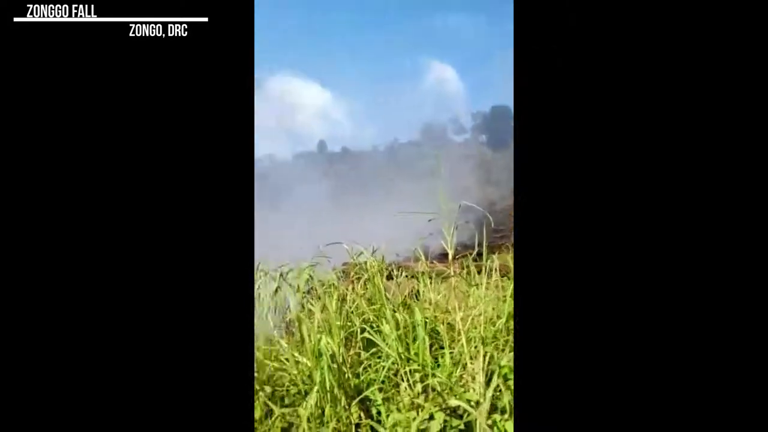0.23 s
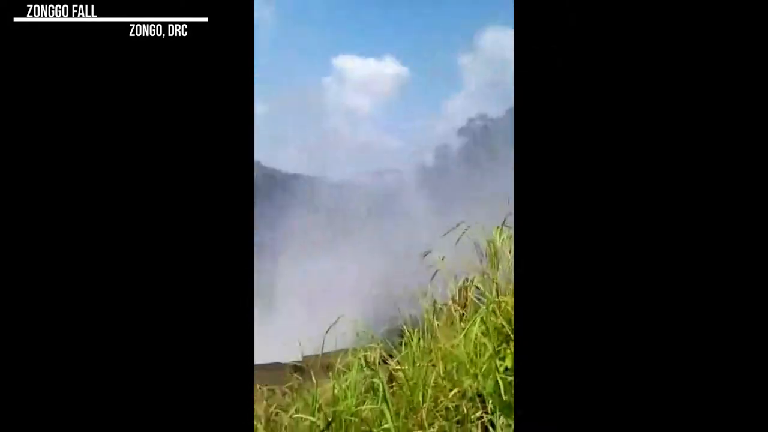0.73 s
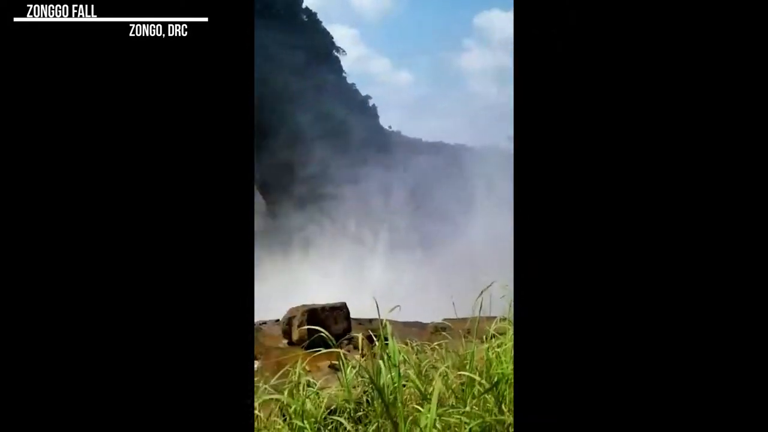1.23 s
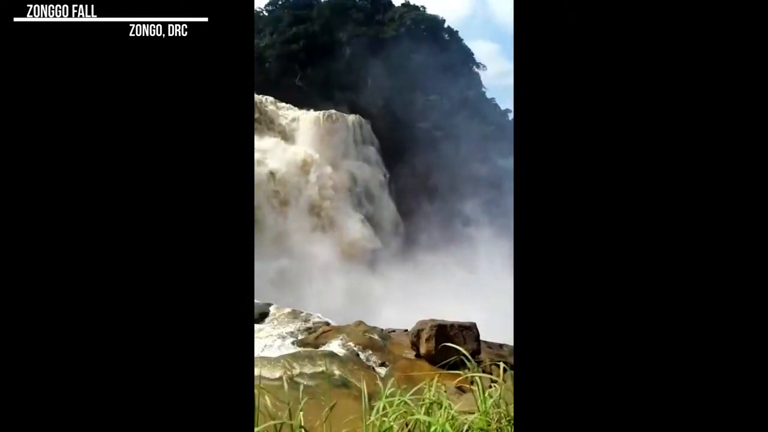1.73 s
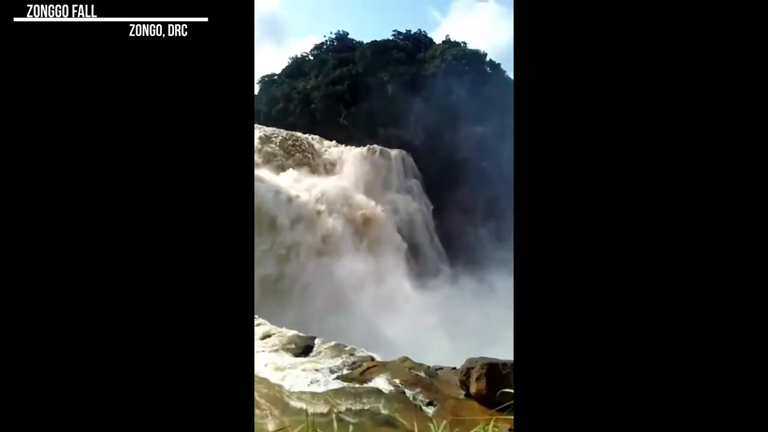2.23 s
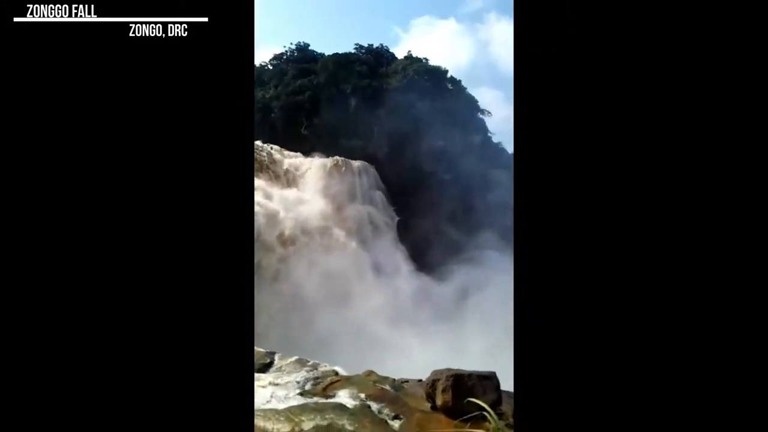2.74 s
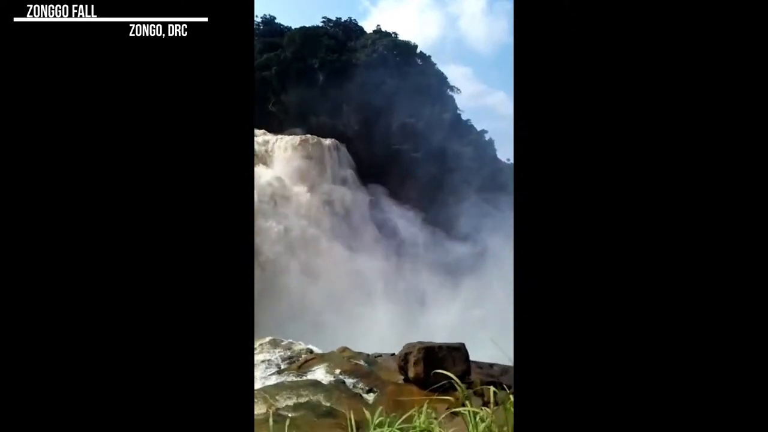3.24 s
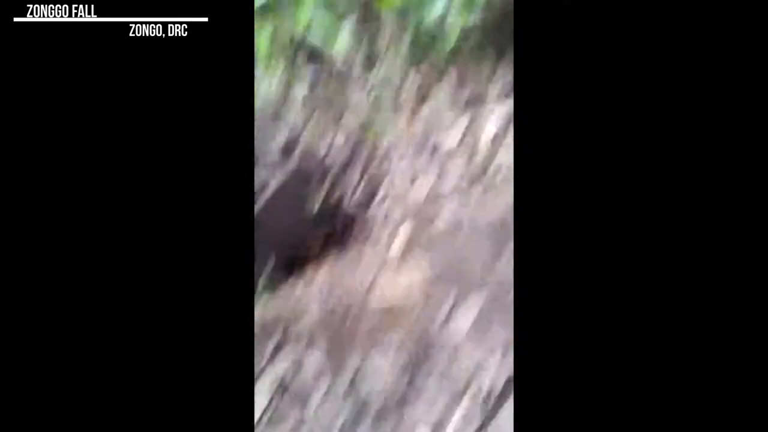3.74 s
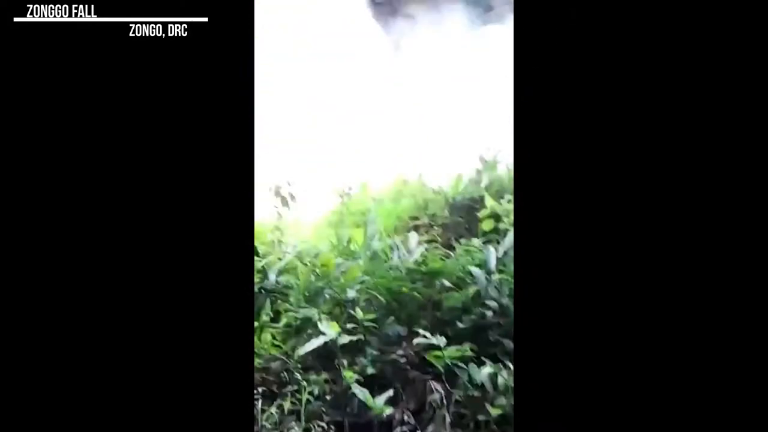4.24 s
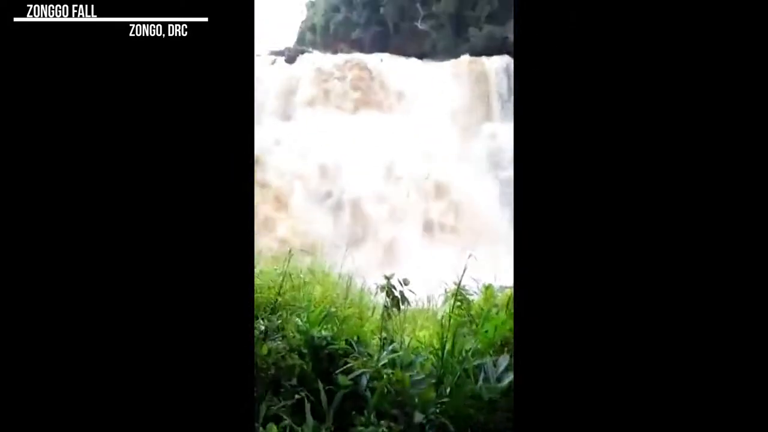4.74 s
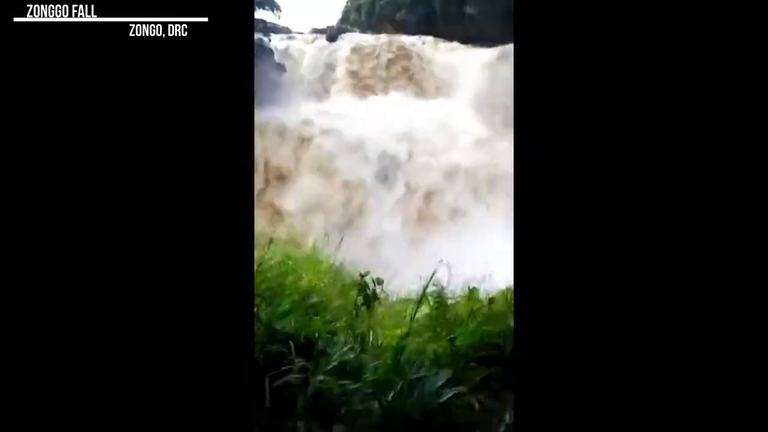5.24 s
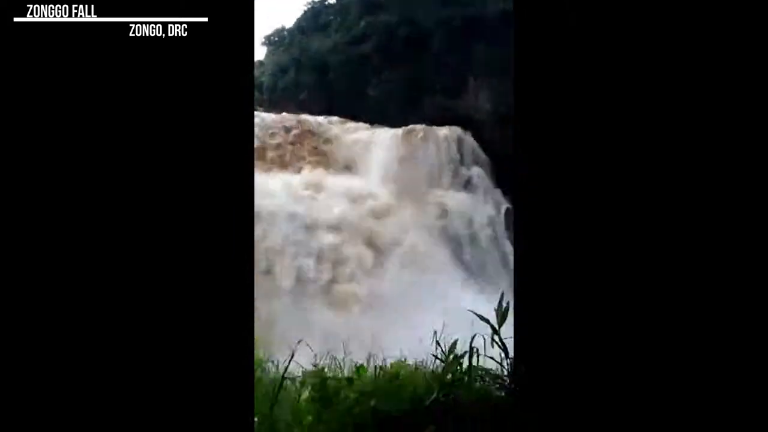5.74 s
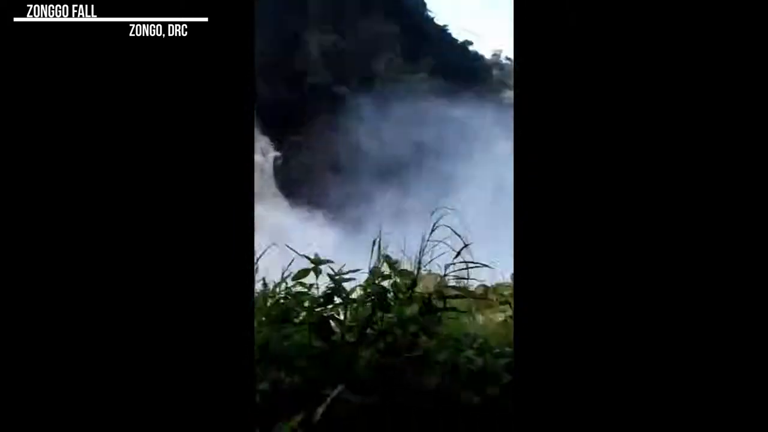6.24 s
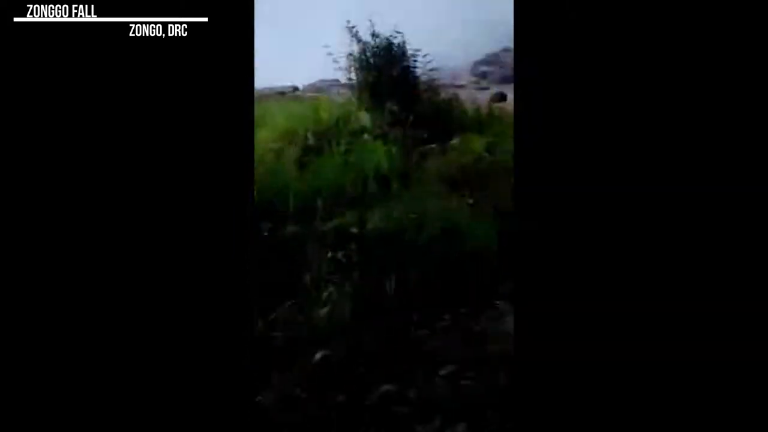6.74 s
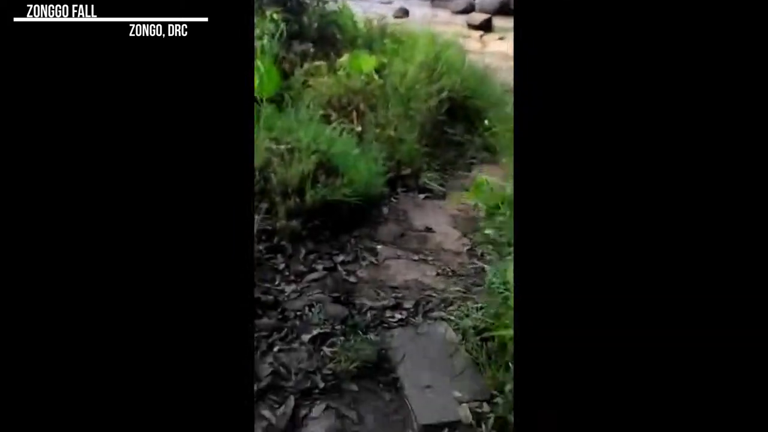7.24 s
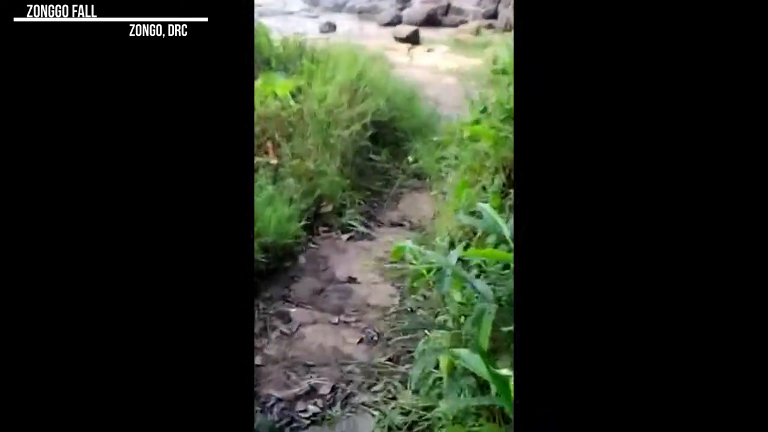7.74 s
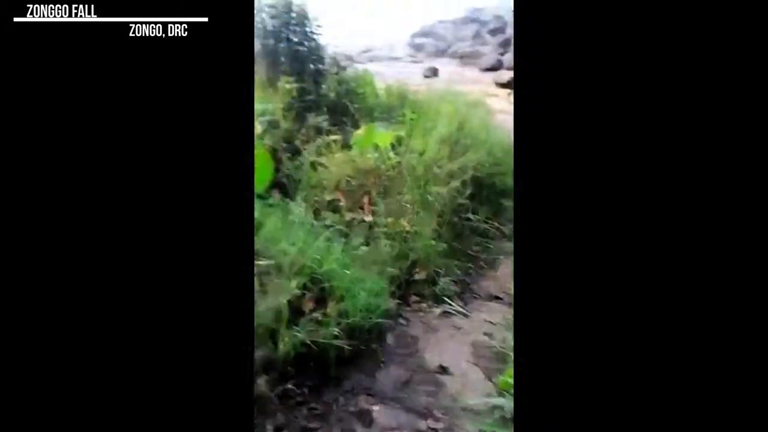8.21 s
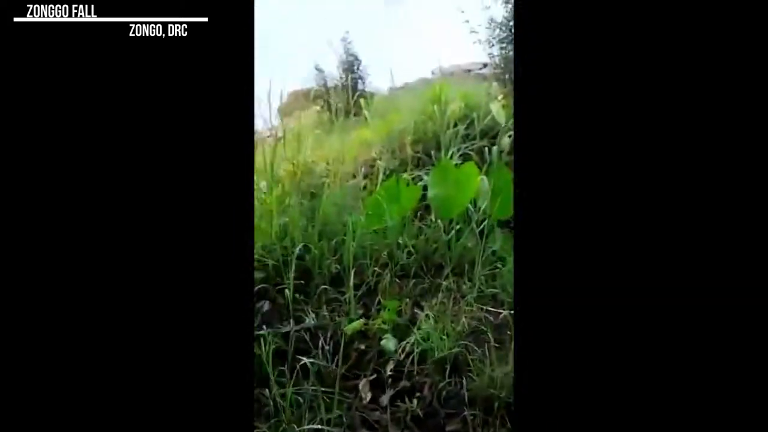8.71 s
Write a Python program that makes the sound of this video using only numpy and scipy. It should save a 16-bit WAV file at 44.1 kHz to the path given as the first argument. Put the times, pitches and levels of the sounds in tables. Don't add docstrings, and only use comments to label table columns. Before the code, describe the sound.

Continuous rushing water from a massive fall, captured outdoors by a handheld phone. Bass gusts thud several times a second beneath the roar, which grows heavier and less hissy as the phone swings towards the fall. A short dead silence interrupts it. The second spot starts loud and splashy, quickly becomes muffled and grainy under noise reduction, then gains some spray hiss before dulling again.

```python
import sys
import numpy as np
from scipy import signal
from scipy.fft import rfft, irfft, dct
from scipy.io import wavfile
from scipy.ndimage import uniform_filter1d

SR = 44100
rng = np.random.default_rng(int(sys.argv[2]) if len(sys.argv) > 2 else 0)


def int16_out(signal):
    q = np.round(np.clip(np.atleast_2d(signal).T, -1, 1) * 32767)
    wavfile.write(sys.argv[1], SR, q.astype(np.int16))


def voltage_ratio(decibels):
    exponent = np.asarray(decibels, float) / 20
    return 10 ** exponent


N = 395565
HOP = 256
FRAME = 1024

# start in seconds, end in seconds.
GAP_S = (3.4078, 4.1502)

# frequency in Hz, density in dB per Hz.
RUMBLE_COLOUR = [(3.5, -32.5), (6.0, -2.5), (31, 2.5), (45, -1.5), (75, -9), (120, -7.5), (160, -59.5),
                 (260, -120)]
# start in seconds, peak in dB, hold in seconds.
FIRST_GUSTS = [(0.0, -26, .09), (.25, -28, 0), (.39, -24.5, 0), (.61, -25, 0.0048), (.79, -25, 0.031),
               (1.01, -24, 0.014), (1.2, -24, 0.0083), (1.38, -26.5, 0.0014), (1.58, -24, 0),
               (1.78, -25.5, 0.067), (2.07, -22.5, 0.0064), (2.22, -28.5, 0), (2.42, -25, 0),
               (2.59, -23, 0), (2.73, -22, 0.013), (2.84, -25, 0), (3.1, -28, .07), (3.3, -27.5, 0.034)]
SECOND_GUSTS = [(4.16, -23.5, 0.0094), (4.24, -22, .02), (4.35, -30, .1), (4.51, -21.5, 0),
                (4.61, -27.5, .4), (5.09, -26.5, 0.015), (5.22, -25.5, 0.035), (5.45, -27.5, .04),
                (5.58, -24, .1), (5.99, -24.5, 0.015), (6.18, -25, 0.042), (6.44, -23, 0.00017),
                (6.6, -28.5, 0.046), (6.75, -25.5, 0), (6.84, -24, .04), (7.19, -27.5, .06),
                (7.31, -24.5, 0), (7.59, -25, .05), (7.78, -22.5, 0.0029), (7.88, -23, 0),
                (8.01, -23.5, 0.034), (8.17, -24, 0.0089), (8.28, -28, .24), (8.64, -23.5, 0.032),
                (8.83, -27, 0.028), (8.95, -25.5, 0.062)]
RISE_DB_PER_S, FALL_DB_PER_S = 239, 158.5
FIRST_LULL_DB, SECOND_LULL_DB = -30.5, -38

ZONE_EDGES_HZ = [320, 1120, 3020, 5900]
# frequency in Hz, density in dB per Hz.
AWAY = [(70, -2), (140, -5), (280, -4.5), (550, -10.5), (850, -7.5), (1050, -14), (1220, -12.5),
        (1900, -12.5), (2800, -17), (3250, -20), (5300, -27), (6600, -31), (8500, -30), (14200, -39.5)]
FACING = [(70, 1.5), (140, -2.5), (280, -5), (550, -6.5), (850, -9), (1050, -12), (1220, -18),
          (1900, -21.5), (2800, -22), (3250, -23), (5300, -23), (6600, -26.5), (8500, -25.5), (14200, -35)]
RAW = [(70, 3), (140, -6), (280, -5.5), (550, -14.5), (850, -11), (1050, -12), (1220, -13.5), (1900, -15),
       (2800, -17), (3250, -16.5), (5300, -19.5), (6600, -23), (8500, -25), (14200, -35)]
SUPPRESSED = [(70, -6), (140, -10), (280, -6.5), (550, -12.5), (850, -12.5), (1050, -11.5), (1220, -20.5),
              (1900, -20.5), (2800, -21), (3250, -27.5), (5300, -29.5), (6600, -20.5), (8500, -18),
              (14200, -28)]
PATH = [(70, -1), (140, -5), (280, -10.5), (550, -7), (850, -11), (1050, -14), (1220, -16.5), (1900, -11),
        (2800, -13.5), (3250, -21.5), (5300, -24.5), (6600, -15), (8500, -12), (14200, -23.5)]
# time in seconds, place in the list of spectra [0-5].
COLOUR_AT = [
    (.8, 0),
    (1.6, 1),
    (3.5, 1),
    (4.0, 2),
    (5.05, 2),
    (5.27, 3),
    (6.85, 3),
    (7.08, 4),
    (8.0, 4),
    (8.2, 5),
]
# slow patches in dB, speckle [0-1].
UNSTEADY = [(0.5, 0.19), (1.86, 0.21), (0.93, 0.28), (.5, 0.2), (0.74, 0)]
FIRST_SPOT_DB = [-32, -31, -31.5, -38.0, -37.5]
SECOND_SPOT_DB = [-32.0, -30.5, -26.5, -28, -32]
# time in seconds, facing [0-1].
TURN = [(0.0, 0.07), (.35, 0.03), (.6, 0.28), (1.1, 0.6), (1.4, 0.83), (2.0, 1.05), (2.4, 0.9), (2.8, 0.97),
        (3.1, .75), (3.4, 0.7), (4.16, 0.48), (5.0, 0.57), (5.4, .95), (6.2, 0.6), (6.7, 0.27), (6.95, 0.4),
        (7.15, 0.5), (8.97, 0.26)]
TURN_DB = [4.0, 3, -5.5, -2.5, -0.44]
# time in seconds, cover [0-1].
COVER = [(0.0, 0), (.2, 0.5), (.42, 0.8), (.65, .85), (.85, 0.41), (1.6, .35), (1.95, 0), (2.2, 0),
         (3.4, .15), (4.16, .1), (5.0, 0), (7.0, 0.07), (7.95, -.1), (8.1, 0.3), (8.25, 0.7), (8.5, 1.05),
         (8.97, 1)]
COVER_DB = [0.8, 1.2, -0.2, -2.5, -7.5]
# time in seconds, grip [0-1].
GRIP = [(5.03, 0.0), (5.12, 0.54), (5.22, 0.86), (5.35, 0.99), (5.6, 0.89), (6.3, 1), (6.9, .95),
        (7.1, 0.7), (7.7, 0.64), (8.1, 0.77), (8.5, 0.7), (8.97, 0.78)]
GRIP_DB = [-10.5, -10.2, -11, -16, -2]
# time in seconds, lift in dB.
SURGES = [
    (1.15, 4),
    (1.65, 1.5),
    (3.28, 3.5),
    (5.52, 2.5),
    (7.15, 4),
    (8.5, 2),
]

# time in seconds, step at 1 kHz in dB, slope in dB per octave.
STARVED = [(.0301, -12, -2.3), (.3784, -12.5, -3), (1.5626, -12.5, -3), (1.6787, -12, -3),
           (2.2592, -11.5, -2.8), (2.7236, -11.5, -2.5), (3.0487, -11.5, -2.8), (3.1648, -10, -3),
           (3.3506, -12, -2.5), (5.5332, -19.5, -.2), (6.8103, -16, -.3)]
# time in seconds, low edge in Hz,
# high edge in Hz, level in dB.
SPLIT = [(0.3291, 5250, 6240, -50.1), (0.8167, 5730, 6850, -51.9), (0.8631, 4260, 5640, -47.2),
         (0.8863, 9690, 12450, -51.4), (1.374, 5730, 6890, -49.8), (2.9994, 8960, 10980, -48.5),
         (3.1387, 10380, 11670, -53.5), (4.2532, 9690, 13700, -43.6), (4.2997, 10380, 12360, -48.2),
         (4.4854, 9000, 10290, -43.5), (4.4854, 11710, 13050, -50.7), (6.018, 5250, 6240, -52.7),
         (6.1341, 4260, 5640, -51.1), (7.3879, 11710, 13050, -49.8), (8.0381, 4220, 5170, -50.9),
         (8.1774, 6290, 7540, -51.2), (8.2239, 4260, 5120, -48.1), (8.8276, 6980, 8230, -51.1),
         (8.9437, 4260, 5170, -48.3), (8.9437, 7620, 10290, -47.8)]


def in_time(rows, t):
    return np.interp(t, *np.transpose(rows))


def at_hz(points, hz):
    point_hz, db = np.transpose(points)
    return np.interp(np.log(hz), np.log(point_hz), db)


def rms_one(x):
    return x / np.sqrt(np.mean(x ** 2) + 1e-20)


def drift(rate, count):
    r = np.exp(-2 * np.pi * rate * HOP / SR)
    white = rng.standard_normal((count, N // HOP + 802))
    slow = signal.lfilter([1], [1, -2 * r, r * r], white)[:, 800:]
    return slow / slow.std(axis=1, keepdims=True)


def gusts():
    t = np.arange(0, N + HOP, HOP) / SR
    s, db, hold = np.transpose(FIRST_GUSTS + SECOND_GUSTS)[:, :, None]
    rise_db = RISE_DB_PER_S * np.maximum(s - t, 0)
    fall_db = FALL_DB_PER_S * np.maximum(t - s - abs(hold), 0)
    lull_db = np.where(t < GAP_S[1] - .3, FIRST_LULL_DB, SECOND_LULL_DB)
    power = voltage_ratio(2 * lull_db) + voltage_ratio(2 * (db - rise_db - fall_db)).sum(axis=0)
    return np.interp(np.arange(N) / SR, t, np.sqrt(power))


def rumble():
    white = rfft(rng.standard_normal(N))
    hz = np.arange(len(white)) * SR / N + 1e-3
    low = rms_one(irfft(white * voltage_ratio(at_hz(RUMBLE_COLOUR, hz)) / (1 + (hz / 75) ** 6), N))
    even = np.sqrt(uniform_filter1d(low ** 2, size=2800) + .15)
    return gusts() * rms_one(low / even)


def zone_levels(t):
    levels = np.where(t < GAP_S[1] - .3, np.c_[FIRST_SPOT_DB], np.c_[SECOND_SPOT_DB])
    for change_db, curve in ((TURN_DB, TURN), (COVER_DB, COVER), (GRIP_DB, GRIP)):
        levels = levels + np.outer(change_db, in_time(curve, t))
    surge_s = 0.11
    levels[0] += sum(db * np.exp(-((t - s) / surge_s) ** 2) for s, db in SURGES)
    return levels


def water():
    hz, t, bins = signal.stft(rng.standard_normal(N), SR, nperseg=4 * HOP, noverlap=3 * HOP)
    hz = np.maximum(hz, 1)
    zone = np.searchsorted(ZONE_EDGES_HZ, hz)
    colours = np.array([at_hz(c, hz) for c in (AWAY, FACING, RAW, SUPPRESSED, PATH, FACING)])
    colours[:, hz < 70] = -80
    for z in range(5):
        power = np.sum(voltage_ratio(2 * colours[:, zone == z]), axis=1, keepdims=True)
        colours[:, zone == z] -= 10 * np.log10(power / 2 / HOP)
    place = in_time(COLOUR_AT, t)
    shares = np.maximum(1 - abs(place - np.arange(len(colours))[:, None]), 0)
    levels = zone_levels(t)
    acting = 1 - 0.67 * shares[2]
    slow_db, speckle = np.transpose(UNSTEADY)[:, zone, None] * acting
    patch = np.round(np.log(np.maximum(hz, 60) / 60) * 5).astype(int)
    patches = drift(2.0, count=patch[-1] + 1)[patch, :len(t)]
    patches = patches + 0.21 * drift(7.0, count=1)[:, :len(t)]
    near = uniform_filter1d(uniform_filter1d(abs(bins) ** 2, size=5, axis=1), size=2, axis=0)
    bins = bins * (near / near.mean()) ** speckle
    bins /= np.sqrt(np.mean(abs(bins) ** 2, axis=1, keepdims=True) / near.mean())
    gain_db = colours.T @ shares + levels[zone] + slow_db * patches
    return signal.istft(bins * voltage_ratio(gain_db), SR, noverlap=3 * HOP)[1][:N]


def scene():
    return np.tile(water() + rumble(), (2, 1))


def starved(x):
    error, half = np.zeros(N), FRAME // 2
    window = np.sin(np.pi * (np.arange(2 * FRAME) + .5) / (2 * FRAME))
    hz = (np.arange(FRAME) + .5) * SR / 2 / FRAME
    for s, step_db, tilt_db in STARVED:
        at = slice(round(s * SR) - FRAME, round(s * SR) + FRAME)
        a, b, c, d = (x[at] * window).reshape(4, half)
        lines = dct(np.r_[-c[::-1] - d, a - b[::-1]], type=4, norm="ortho")
        step = voltage_ratio(step_db + tilt_db * np.log2(np.maximum(hz, 200) / 1000))
        rounded = np.floor((abs(lines) / step) ** .75 + .4054) ** (4 / 3)
        coarse = np.sign(lines) * step * rounded
        u, v = dct((coarse - lines) * (hz < 13780), type=4, norm="ortho").reshape(2, half)
        error[at] += window * np.r_[v, -v[::-1], -u[::-1], -u]
    return error


def split_bands():
    side, draws = np.zeros(N + FRAME), rng.standard_normal((len(SPLIT), 2 * FRAME))
    hz = np.arange(FRAME + 1) * SR / 2 / FRAME
    window = signal.windows.kaiser(2 * FRAME, beta=9.0)
    for (s, low_hz, high_hz, db), draw in zip(SPLIT, draws):
        band = rms_one(irfft(rfft(draw) * (hz > low_hz) * (hz < high_hz)))
        start = round(s * SR) - FRAME
        side[start:start + 2 * FRAME] += voltage_ratio(db + 3.5) * band * window
    return side[:N]


def roll_off(x):
    return signal.sosfilt(signal.butter(12, 15570, fs=SR, output="sos"), x)


def record(dry):
    x = .45 * np.tanh(dry[0] / .45)
    t = np.arange(N) / SR
    x = (x + starved(x)) * ((t < GAP_S[0] + .1) | (t > GAP_S[1]))
    top_hz = 14320
    x = irfft(rfft(x, 2 * N) * (np.arange(N + 1) * SR / 2 / N < top_hz))[:N]
    x = x * ((t < GAP_S[0]) | (t > GAP_S[1] - .003))
    mix = x + split_bands() * [[1], [-1]]
    return roll_off(mix)


dry = scene()
out = record(dry)
int16_out(out)
```